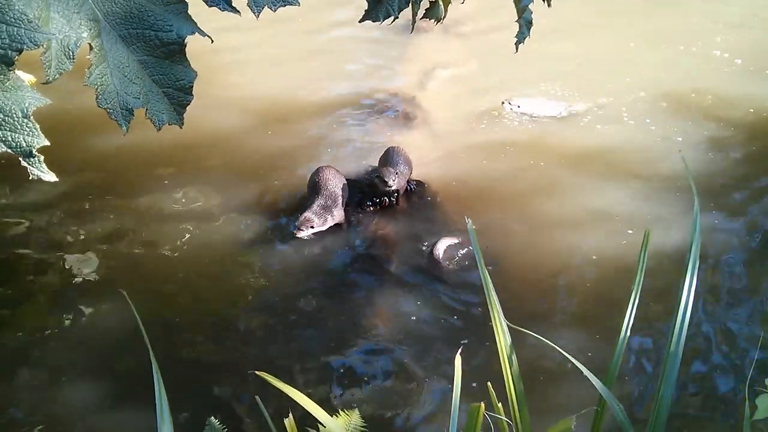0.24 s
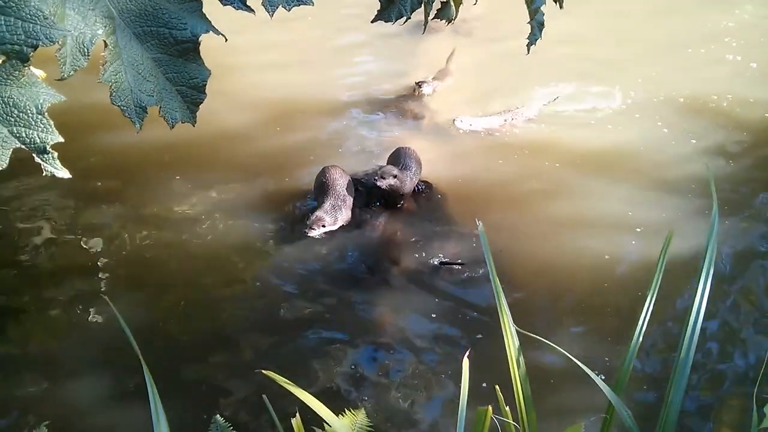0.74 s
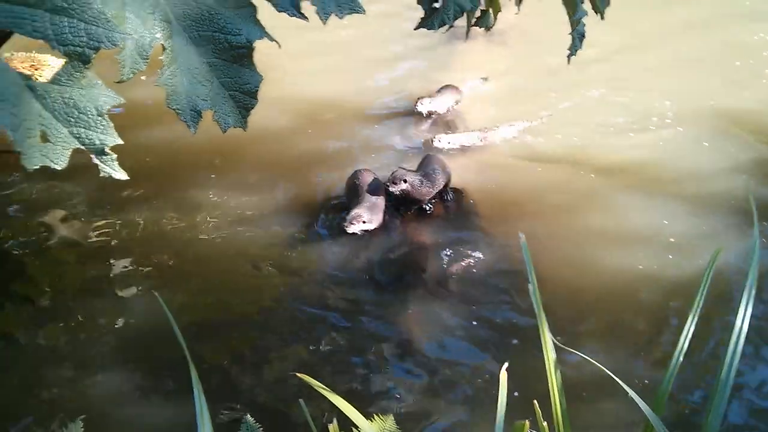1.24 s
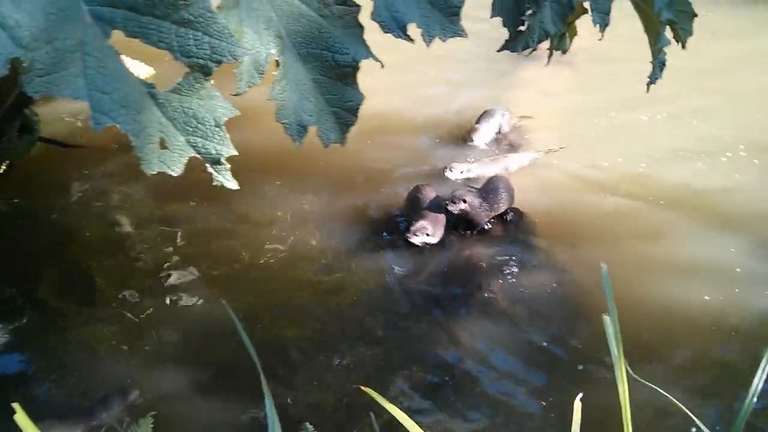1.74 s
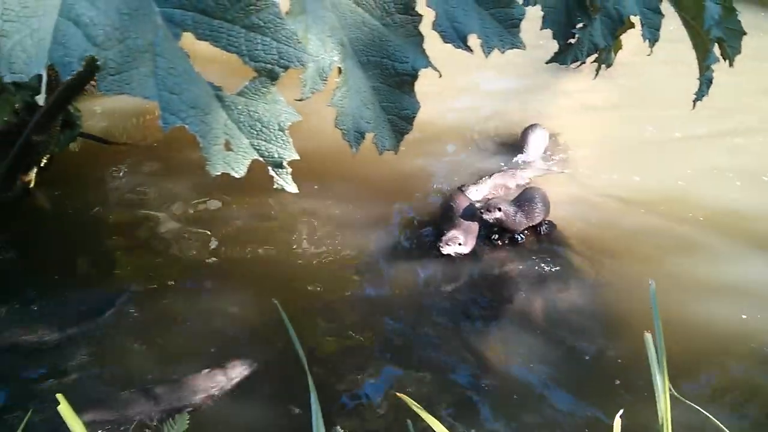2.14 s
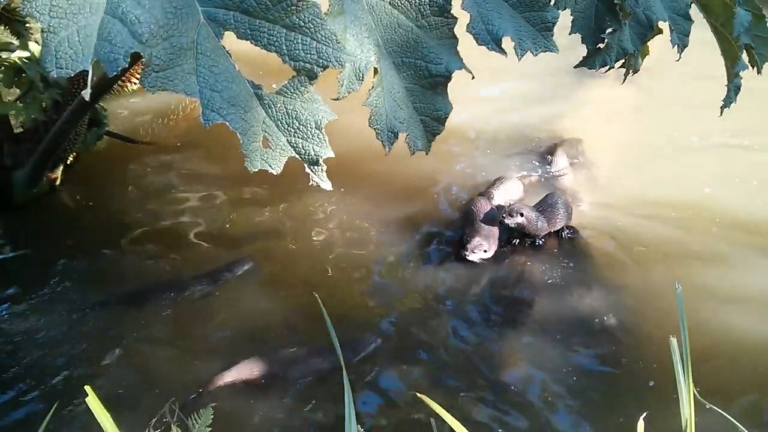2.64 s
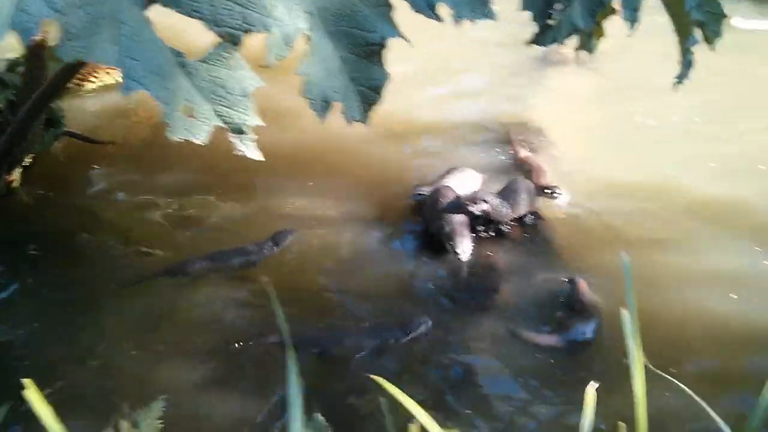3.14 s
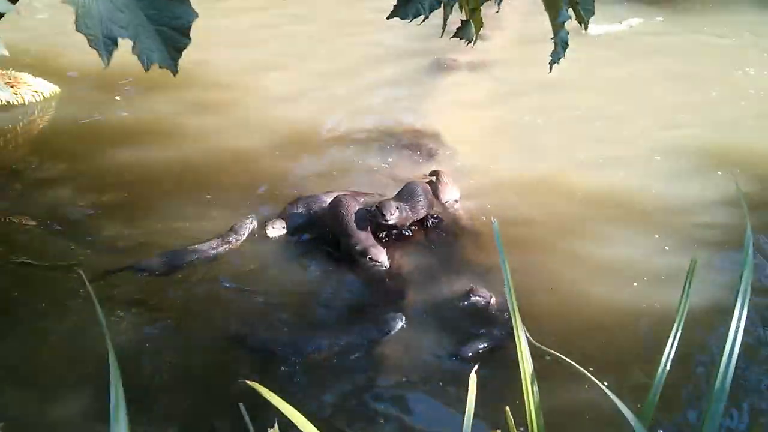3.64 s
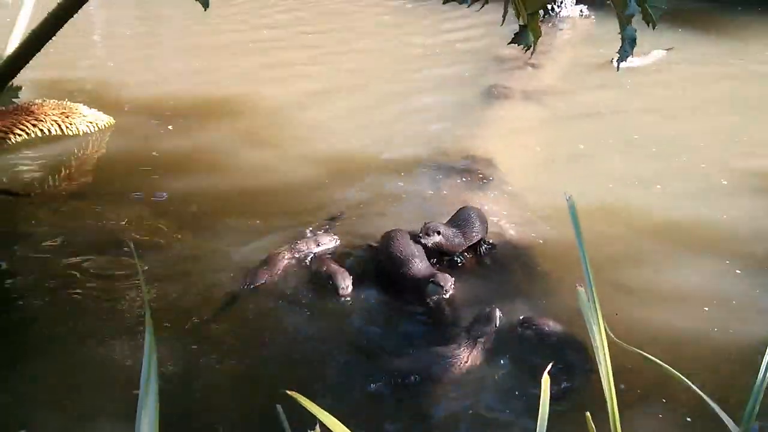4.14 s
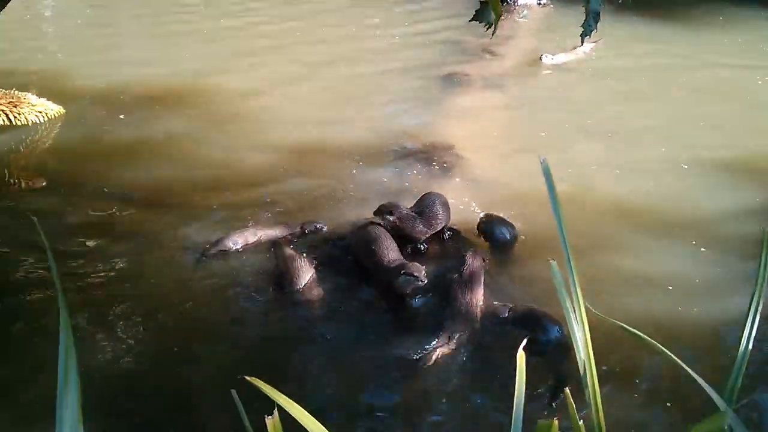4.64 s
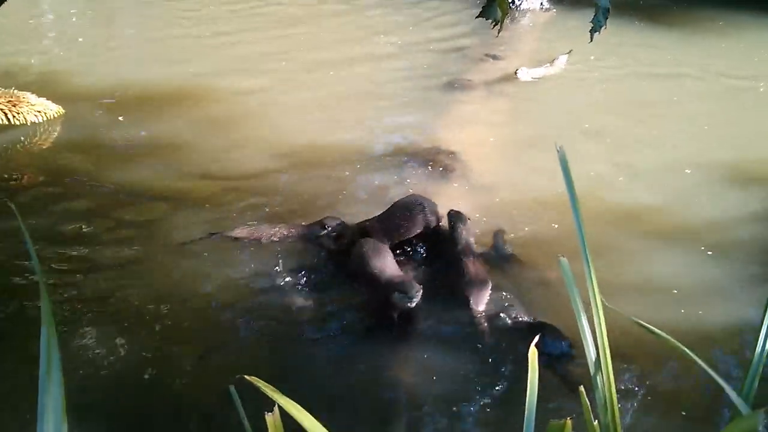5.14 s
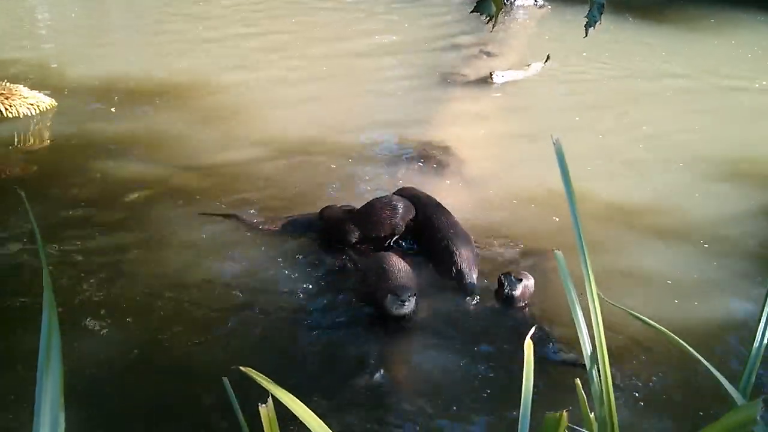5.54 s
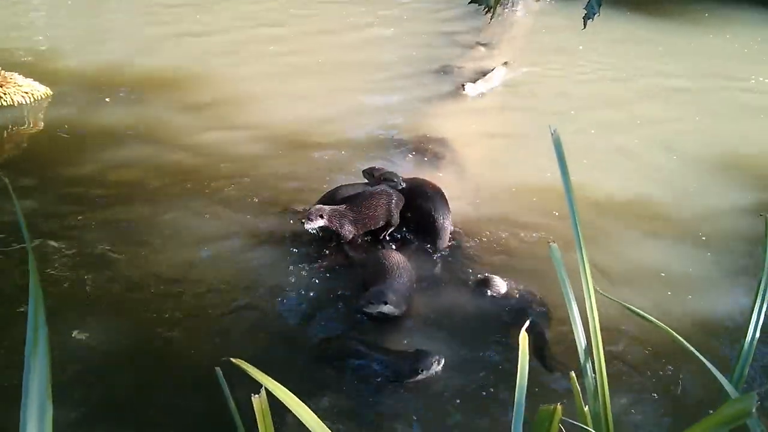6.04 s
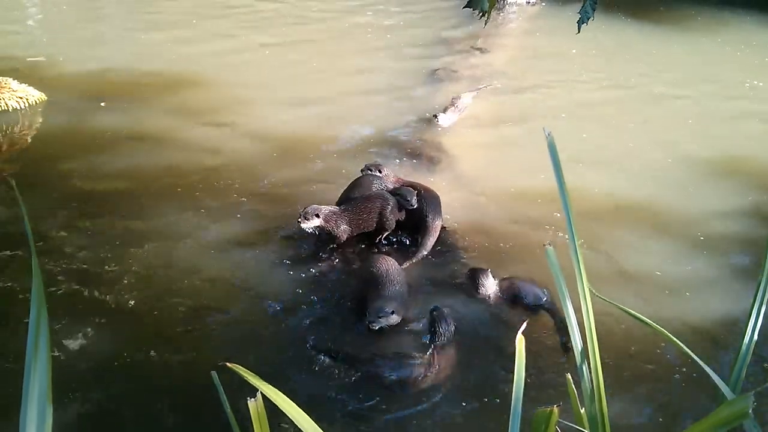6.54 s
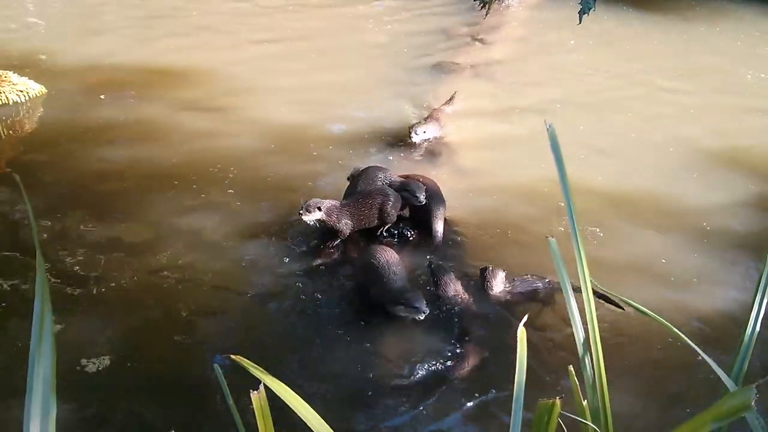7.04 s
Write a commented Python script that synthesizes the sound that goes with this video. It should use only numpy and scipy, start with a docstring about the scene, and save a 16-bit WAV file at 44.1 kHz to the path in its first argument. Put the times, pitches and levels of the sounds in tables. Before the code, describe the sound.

Small otters squeak piercingly and break into raspy, falling squeals and drawn-out wails in a pond, over low rumble, soft plops and hiss.

```python
"""Small otters crowd on a rock in a pond and beg close by: five falling squeaks break into lower, raspy
squeals or long wails. Other otters whistle and chatter in between and a few cry thinly further off.
Voices are unsteady partials with breath noise, whistles and far cries are wavering near-sines.
Water and banks throw back short echoes; behind lie rumble and hiss from coloured noise, and small
plops from ringing sines. The hiss grows halfway through. One microphone feeds both channels."""
import sys
import numpy as np
from scipy import signal
from scipy.fft import rfft, irfft, next_fast_len
from scipy.io import wavfile
from scipy.ndimage import uniform_filter1d

SR = 44100
rng = np.random.default_rng(int(sys.argv[2]) if len(sys.argv) > 2 else 0)


def persist_wave(psi):
    """Save psi, clipped to +-1, as 16-bit WAV."""
    counts = np.round(np.clip(psi, -1, 1) * 32767).astype(np.int16)
    wavfile.write(sys.argv[1], SR, np.atleast_2d(counts).T)


N = 321930
TIME = np.arange(N) / SR
TOP_HZ = 15700  # nothing is kept above this

# background colour before and after it brightens: pitch_hz, relative_density_db [dB per Hz]
CALM_COLOUR = [(18, -56), (30, -19), (59, -11), (108, -3), (230, 2), (399, -7.5), (591, 2), (830, -8.5),
               (921, -5), (2240, -12.5), (3320, -24), (4090, -13), (6370, -11.5), (8500, -4.5),
               (15500, -35)]
BRIGHT_COLOUR = [(18, -43), (30, -8), (64, -11), (105, -4), (467, 0), (728, -11.5), (970, 5.5),
                 (1440, -20.5), (1870, -18.5), (2300, -17.5), (3230, -20), (4090, -12), (6540, -6.5),
                 (8500, 2), (15500, -11)]
CALM_DB, BRIGHT_DB = -38.5, -34.5  # before the mix of the two and the level curves
# the background brightens once; the shares run 0-1
BRIGHTENS_S, BRIGHTEN_TIME_S, SHARE_BEFORE, SHARE_AFTER = 3.96, 0.11, 0.064, 0.75
# level curve of the high hiss: time_s, relative_level_db
HISS_CURVE = [(0, 0), (1.6, -.5), (3.7, -1), (4.15, 7), (4.9, 3.5), (6.2, 4.5), (7.3, 9.5)]
# level curve of the low outdoor rumble: time_s, relative_level_db
RUMBLE_CURVE = [(0, 1.5), (1.5, 0.6), (2.1, 2.7), (2.65, 0), (4.2, 3), (7.3, 3.5)]

# water plops: start_s, starting_pitch_hz, level_db, ring_s [time to fall 60 dB]
PLOPS = [(0.74, 149, -53, .15), (1.05, 727, -35, 0.12), (1.412, 234, -33.5, 0.16), (1.771, 236, -34, .15),
         (1.821, 148, -35, 0.14), (1.861, 253, -33.5, 0.23), (2.04, 260, -30, 0.1), (2.291, 208, -35, 0.14),
         (2.62, 730, -39, 0.17)]

# early echoes from water and banks: delay_s, level_db
EARLY_ECHOES = [(.0031, -16), (.0083, -9.5), (0.0141, -27)]
# colour of the sound scattered by leaves and ripples: pitch_hz, gain_db
SCATTER_COLOUR = [(2500, 3.5), (4500, 2.5), (6500, 4), (8300, 7.5), (11000, 1), (15000, 0)]
POND_T60_S, POND_WET_DB = .22, -14.5  # around the rock; wet level before the scatter colour
# colour of the near calls while the background is calm: pitch_hz, gain_db
DULL_COLOUR = [(8500, 0), (10000, -15.5), (11500, -15), (14000, -11)]

# thin far cries: start_s, length_s, start_hz, middle_hz, end_hz, peak_level_db,
#   loudest_at [share of length], octave_db
FAR_CRIES = [(1.798, 0.086, 1030, 1047, 1030, -37.5, 0.45, -18),
             (2.049, 0.39, 1020, 1032, 901, -46.5, .65, -1), (5.546, .48, 2410, 2368, 1894, -48, 0.56, -6),
             (6.096, 0.87, 1845, 1675, 1938, -49.5, 0.67, -3)]
FAR_SWELL_DB = 11  # from the edges of a far cry to its loudest moment
# nearly pure whistles near the rock: start_s, length_s, start_hz, middle_hz, end_hz, peak_level_db,
#   loudest_at [share of length], roughness [0-1]
WHISTLES = [(1.122, 0.027, 3540, 3370, 3210, -25.5, 0.39, 0.1),
            (1.423, 0.058, 5300, 4950, 5050, -39.5, 0.72, 0),
            (1.469, .09, 5120, 4430, 4420, -33.5, 0.72, 0.17),
            (1.553, 0.037, 4420, 3740, 2420, -39, .15, 0.48), (2.762, 0.071, 3480, 3315, 2990, -36, 1, 0.1),
            (3.013, .11, 3580, 3790, 3990, -32, 0.91, 0.26),
            (3.843, 0.048, 5220, 4830, 4200, -23.5, 1, 0.13),
            (3.885, 0.04, 4350, 5140, 5700, -20, .2, 0.02),
            (3.93, 0.047, 5720, 4620, 3050, -14.5, .35, 0.17),
            (3.997, .07, 3360, 2750, 2420, -38.5, 0.17, 0.4),
            (4.758, .095, 6070, 5500, 4650, -41, .25, 0.27),
            (5.233, 0.038, 3460, 3900, 4880, -26, 0.81, .2),
            (5.268, .046, 4880, 5140, 3470, -31, 0.78, 0.1),
            (6.293, 0.067, 5900, 5140, 4500, -29, 0.61, 0.14),
            (6.353, 0.056, 4600, 5370, 4180, -28.5, 0.91, 0.04),
            (6.411, 0.065, 2980, 3284, 2820, -31, .5, 0.35)]
WHISTLE_SWELL_DB = 8.5  # from the edges of a whistle to its loudest moment

# soft rough chatter: start_s, length_s, start_hz, end_hz, relative_level_db
CHATTER = [(2.731, 0.12, 1590, 1410, -44.5), (2.849, 0.08, 1482, 1387, -40.5),
           (2.91, 0.14, 1500, 1420, -42), (3.017, .17, 1474, 1350, -42)]
# breathy rasp in the voice: pitch_hz, gain_db
RASP_COLOUR = [(1500, -22), (2900, -2.5), (3800, 5), (4800, 7.5), (6200, 2.5), (8300, 8), (11500, -38),
               (13500, -21), (15500, -26)]
# throat and mouth colour of the low and the high register: pitch_hz, gain_db
SQUEAL_THROAT = [(1100, -31), (1750, -1), (2130, -15.5), (2350, 6.5), (2800, 0.5), (3400, 8), (4100, 1),
                 (5100, 10.5), (6300, 0), (8300, 9.5), (9700, 4.5), (12000, -5), (13500, -11), (15500, -26)]
SQUEAK_THROAT = [(2500, 9), (4200, 6), (6200, -10), (8300, -18), (10000, -6.5), (11500, -2), (13000, -24.5),
                 (15500, -27)]

# two squeals drawn out into wails: time_s, pitch_hz, 6_to_10_khz_db, treble_db [both relative]
FIRST_WAIL = [(3.935, 1834, -13, -33), (3.959, 1744, -15.5, -26), (4.081, 1712, -24, -37),
              (4.147, 1450, -24.5, -27), (4.181, 1260, -23, -23), (4.209, 1183, -24, -24),
              (4.341, 1149, -26.5, -24.5), (4.499, 1247, -28, -35), (4.535, 1204, -28, -40),
              (4.565, 1368, -28, -45), (4.585, 1324, -36, -40)]
LAST_WAIL = [(6.665, 1926, -21, -46), (6.721, 1800, -28, -35), (6.741, 1584, -22, -31),
             (6.781, 1429, -24, -27), (6.807, 1478, -25, -29), (6.827, 1316, -24.5, -25),
             (6.865, 1216, -30, -29), (6.939, 1127, -28, -28), (6.969, 1188, -28.5, -31),
             (7.161, 1062, -22.5, -28), (7.3, 1111, -21, -34)]
# squeals, the low register: start_s, length_s, first_hz, second_hz, slide_middle_s [after start],
#   slide_time_s, final_lift_hz, relative_level_db, fade_db, 6_to_10_khz_db [to the level],
#   6_to_10_khz_change_db, treble_db [to the level], mouth_hz, harsh_start [0-1], roughness [0-1]
SQUEALS = [(1.077, 0.066, 1777, 1475, 0.007, 0.0026, 3, -29, -7, 2.5, -6, -6, 4450, 0.33, 0.16),
           (1.148, 0.076, 1767, 1490, 0.037, .006, 5, -30, -0.5, 1, -1, -2, 4420, 0.95, 0.46),
           (1.216, 0.076, 1616, 1320, .039, 0.00495, 3, -25, -6.5, -2, 1, 0, 4360, 0.3, 0.24),
           (1.292, 0.04, 1350, 1493, 0.0054, 0.0032, 6, -27.5, 5, -6.5, -1, -17, 4200, 0, 0.2),
           (2.348, .19, 1870, 1304, 0.029, 0.014, 337, -24.5, -1, 6, -11.5, -3.5, 4630, 0.57, 0.19),
           (5.225, 0.054, 1748, 2025, 0.02, 0.0069, 3, -24, 2, 5.5, -11, -9, 4380, 0.42, 0.42),
           (5.315, .222, 1771, 1281, .074, 0.015, 188, -21.5, -0.5, 4, -9.5, 0, 4850, 0.78, 0.25),
           (6.794, .55, 1523, 1346, .015, 0.024, 0, -32, -7, -14.5, -2, -11, 2700, 0, 0.38)]
BREAK_S = 0.0194  # decay of the harsh start
LIFT_S, SQUEAL_RELEASE_SHARE = .022, 0.17  # growth time of the final lift; share of length that dies away
OPEN_TREBLE_DB = 4  # the mouth is widest mid-call: treble this much stronger than at the ends

# squeaks, the high register: start_s, length_s, attack_s, onset_hz, crest_hz, end_hz, catch [0-1],
#   relative_level_db, fade_db, 6_to_10_khz_db [to the level],
#   treble_db [to the level and the throat gain at the third partial], roughness [0-1]
SQUEAKS = [(0.995, .105, 0.0068, 4390, 3550, 3300, 0.55, -26, -12, -4.5, 7.5, 0.2),
           (2.198, .155, .024, 4790, 3687, 3153, 0, -21.5, -4, -1.5, 2.5, 0.14),
           (3.785, .15, 0.019, 5620, 4057, 3310, .9, -19.5, -10.5, 8.5, 7, 0.08),
           (5.078, .15, 0.012, 4790, 4287, 3216, .4, -13, -12.5, 2, 10.5, 0.19),
           (6.484, .188, 0.0041, 4806, 4150, 2866, .95, -20.5, -11.5, -3.5, -1, 0.37)]
FLICK_S = .017  # time constant of the drop from the onset pitch
# a full catch in the voice: lower and weaker
CATCH_S, CATCH_WIDTH_S, CATCH_PITCH_SHARE, CATCH_DB = 0.037, 0.011, .06, -10.5
CREST_S, SAG_POWER, SQUEAK_FADE_POWER = 0.04, 2.2, 2.75  # past the crest it sags; it fades ever faster
GROWL_HZ, GROWL_DB = 137, 1  # pulsing at full sag; the rate wavers
ACCENT_DB, ACCENT_S = 3.5, 0.012  # brief accent at the start


def undb(db):
    """Decibels to gain."""
    return 10 ** (np.asarray(db) / 20)


def unit(x):
    """Scale to rms 1."""
    return x / np.sqrt(np.mean(x ** 2) + 1e-20)


def gain_at(hz, points):
    """Gain of a (Hz, dB) spectrum at the given frequencies."""
    f, db = np.transpose(points)
    return undb(np.interp(np.log(hz + 1e-3), np.log(f), db))


def colour(x, points):
    """Filter a sound with a (Hz, dB) spectrum."""
    return irfft(rfft(x) * gain_at(np.fft.rfftfreq(len(x), 1 / SR), points), len(x))


def wander(n, hz):
    """Smooth chance of spread 1, moving mostly slower than hz."""
    size = next_fast_len(n + SR // 4)
    f = np.fft.rfftfreq(size, 1 / SR)
    lowpass = np.exp(-.5 * (f / hz) ** 2)
    return unit(irfft(rfft(rng.standard_normal(size)) * lowpass, size))[:n]


def add(out, start, x):
    """Mix a sound in from a given sample on."""
    x = x[:max(N - start, 0)]
    out[start:start + len(x)] += x


def span(s, length, attack_s, release_s):
    """First sample, time since the start and attack-hold-release gate of one call."""
    t = np.arange(int(length * SR)) / SR
    ramp = np.clip(np.minimum(t / attack_s, (length - t) / release_s), 0, 1)
    return int(s * SR), t, np.sin(np.pi / 2 * ramp) ** 2


def step(x, middle, width):
    """A smooth rise from 0 to 1."""
    return .5 + .5 * np.tanh((x - middle) / (2 * width))


def arch(u, first, middle, last):
    """A parabola through three values as u runs from 0 to 1."""
    return first + (last - first) * u + (middle - (first + last) / 2) * (1 - (2 * u - 1) ** 2)


def swell(u, peak):
    """0 at the loudest moment, falling to -1 at both ends of a call."""
    peak = np.clip(peak, .05, .95)
    return -np.maximum((peak - u) / peak, (u - peak) / (1 - peak)) ** 2


def bright_share():
    """How far the background has turned from calm to bright, 0-1."""
    share = SHARE_BEFORE + (SHARE_AFTER - SHARE_BEFORE) * step(TIME, BRIGHTENS_S, BRIGHTEN_TIME_S)
    return np.clip(share, 0, 1)


def background():
    """A low restless rumble under a smooth high hiss: coloured noise, its octaves changing level apart."""
    hiss_db = np.interp(TIME, *np.transpose(HISS_CURVE))
    rumble_db = np.interp(TIME, *np.transpose(RUMBLE_CURVE))
    share = bright_share()
    calm = undb(CALM_DB) * unit(colour(rng.standard_normal(N), CALM_COLOUR))
    bright = undb(BRIGHT_DB) * unit(colour(rng.standard_normal(N), BRIGHT_COLOUR))
    spectrum = rfft(calm * np.sqrt(1 - share) + bright * np.sqrt(share))
    octave = np.log2(np.clip(np.fft.rfftfreq(N, 1 / SR), 62.5, 8000) / 62.5)
    out = np.zeros(N)
    for band in range(8):
        x = irfft(spectrum * np.clip(1 - abs(octave - band), 0, 1), N)
        if band < 5:  # centred on 1 kHz and below
            level_db = rumble_db + 3.0 * wander(N, 18) - 2.17
        else:
            level_db = hiss_db + .5 * wander(N, 18)
        out += x * undb(level_db)
    return out


def plops():
    """Pockets of air ring and rise a little in pitch as the swimmers stir the water."""
    out, t = np.zeros(N), TIME[:SR // 4]
    for s, hz, db, ring in PLOPS:
        tone = np.sin(2 * np.pi * hz * t * (1 + .5 * t))
        fade = np.exp(-np.log(1000) * t / ring) * (1 - np.exp(-t / 0.001))
        add(out, int(s * SR), undb(db) * tone * fade)
    return out


def pond(x, wet_db, t60):
    """A few early echoes and a short scattered tail from banks and leaves."""
    t = TIME[:SR // 2]
    tail = colour(rng.standard_normal(len(t)), SCATTER_COLOUR)
    fade = unit(np.exp(-np.log(1000) * t / t60) * (1 - np.exp(-t / 0.044))) / np.sqrt(len(t))
    response = undb(wet_db) * tail * fade
    response[0] = 1  # direct sound
    for delay, db in EARLY_ECHOES:
        response[int(delay * SR)] += undb(db)
    return signal.fftconvolve(x, response)[:N]


def whistle(hz, db, jitter, overtone_db):
    """A wavering near-sine with an added octave."""
    n = len(hz)
    phase = 2 * np.pi * np.cumsum(hz * (1 + jitter * wander(n, 294))) / SR
    tone = np.sin(phase) + undb(overtone_db) * np.sin(2 * phase)
    return np.sqrt(2) * undb(db + 2 * wander(n, 70)) * tone


def far_cries():
    """Long thin calls from further away: arching near-sines that swell and fade."""
    out = np.zeros(N)
    for s, length, first_hz, middle_hz, last_hz, db, peak, octave_db in FAR_CRIES:
        start, t, gate = span(s, length, attack_s=0.014, release_s=.016)
        hz = arch(t / length, first_hz, middle_hz, last_hz)
        level_db = db + FAR_SWELL_DB * swell(t / length, peak)
        add(out, start, gate * whistle(hz, level_db, jitter=0.019, overtone_db=octave_db))
    return out


def whistles():
    """Short whistles of the other otters: arching near-sines whose roughness shakes the pitch."""
    out = np.zeros(N)
    for s, length, first_hz, middle_hz, last_hz, db, peak, rough in WHISTLES:
        start, t, gate = span(s, length, attack_s=0.0044, release_s=0.0023)
        hz = arch(t / length, first_hz, middle_hz, last_hz)
        level_db = db + WHISTLE_SWELL_DB * swell(t / length, peak)
        add(out, start, gate * whistle(hz, level_db, 0.088 * rough, overtone_db=-15))
    return out


def bands(hz):
    """Shares of a frequency in the low, middle and treble range of the voice."""
    first, second = (.5 + .5 * np.tanh((hz - edge) / 300) for edge in (6100, 9700))
    return 1 - first, first - second, second


def voice(hz, dbs, rough, colour_of, jitter, jitter_hz, quaver, shimmer_db, flutter_db, rasp_db):
    """Vocal folds with unsteady cycles sound through the throat; roughness shakes the pitch and adds rasp."""
    n = len(hz)
    hz = hz * (1 + jitter * rough * wander(n, jitter_hz) + quaver * wander(n, 52))
    phase = 2 * np.pi * np.cumsum(hz) / SR
    k = np.arange(1, 14)[:, None]  # partial numbers
    weight = colour_of(k * hz) * (k * hz < TOP_HZ)
    # head turns and rippling reflections make each partial flutter on its own
    flutter = undb(flutter_db * np.array([wander(n, 25.5) for _ in k]))
    partials = np.sin(k * phase + 2 * np.pi * rng.random(k.shape)) * flutter
    # air rushes through once a cycle
    air = rfft(rng.standard_normal(n) * (1 + np.cos(phase)))
    f = np.fft.rfftfreq(n, 1 / SR)
    tone_share = np.sqrt(np.clip(1 - rough ** 2 / 2, 0, 1))
    out = np.zeros(n)
    for db, share, air_share in zip(dbs, bands(k * hz), bands(f)):
        w = weight * share
        # levelled by its own power; the floor keeps an empty band quiet
        tone = np.sum(w * partials, axis=0) / np.sqrt(np.sum(w ** 2, axis=0) / 2 + 0.0016)
        breath = unit(irfft(air * air_share * gain_at(f, RASP_COLOUR), n))
        rasp = breath * rough * undb(rasp_db)
        out += undb(db) * (tone * tone_share + rasp)
    return out * undb(shimmer_db * wander(n, 107))


def chatter(s, length, first_hz, last_hz, db):
    """A soft rough note through a nearly closed mouth, unsteady in pitch and level."""
    start, t, gate = span(s, length, attack_s=0.021, release_s=0.027)
    hz = first_hz + (last_hz - first_hz) * t / length

    def throat(f):
        mouth_db = 7 * np.exp(-((f - 4200) / 600) ** 2) - 12 * step(f, 4800, 200)
        return gain_at(f, SQUEAL_THROAT) * undb(mouth_db)

    x = voice(hz, (db, db - 19, db - 20), 0.32, throat, jitter=0.042, jitter_hz=250,
              quaver=0.0165, shimmer_db=3, flutter_db=4, rasp_db=5.5)
    return start, x * gate


def squeal_voice(t, hz, dbs, mouth_hz, harsh, rough):
    """The low register: many partials, lifted near the mouth resonance, with a harsh start."""
    def throat(f):
        return gain_at(f, SQUEAL_THROAT) * undb(8.3 * np.exp(-((f - mouth_hz) / 800) ** 2))

    rough = rough + harsh * np.exp(-(t / BREAK_S) ** 2)
    return voice(hz, dbs, rough, throat, jitter=0.0366, jitter_hz=258,
                 quaver=0.00497, shimmer_db=0.6, flutter_db=3.0, rasp_db=-0.5)


def wail(curve, first_db, middle_db, last_db, overtones_db, mouth_hz, harsh,
         first_rough, middle_rough, last_rough):
    """A long wavering squeal; its low partials and its roughness arch slowly."""
    s, *columns = np.transpose(curve)
    start, t, gate = span(s[0], s[-1] - s[0], attack_s=0.0048, release_s=0.0044)
    u = t / t[-1]
    hz, mid_db, top_db = (np.interp(s[0] + t, s, c) for c in columns)
    dbs = arch(u, first_db, middle_db, last_db), mid_db + overtones_db, top_db + overtones_db
    rough = arch(u, first_rough, middle_rough, last_rough)
    return start, gate * squeal_voice(t, hz, dbs, mouth_hz, harsh, rough)


def squeal(s, length, first_hz, second_hz, slide_at_s, slide_s, lift_hz, db, fade_db,
           mid_db, mid_change_db, top_db, mouth_hz, harsh, rough):
    """A nasal whine that slides to a second pitch and lifts at the end."""
    start, t, gate = span(s, length, attack_s=0.0037, release_s=SQUEAL_RELEASE_SHARE * length)
    u = t / length
    slide = (second_hz - first_hz) * step(t, slide_at_s, slide_s)
    hz = first_hz + slide + lift_hz * np.exp((t - length) / LIFT_S)
    db = db + fade_db * u
    treble_db = db + top_db - OPEN_TREBLE_DB * (2 * u - 1) ** 2
    dbs = db, db + mid_db + mid_change_db * u, treble_db
    return start, gate * squeal_voice(t, hz, dbs, mouth_hz, harsh, rough)


def squeak(s, length, attack_s, onset_hz, crest_hz, end_hz, catch, db, fade_db, mid_db, top_db, rough):
    """A piercing note with few partials: it flicks down, may catch, crests and sags."""
    start, t, gate = span(s, length, attack_s, release_s=0.0027)
    caught = catch * np.exp(-((t - CATCH_S) / CATCH_WIDTH_S) ** 2)
    sag = np.clip((t - CREST_S) / (length - CREST_S), 0, 1) ** SAG_POWER
    hz = crest_hz * (1 - CATCH_PITCH_SHARE * caught)
    hz = hz + (onset_hz - crest_hz) * np.exp(-t / FLICK_S) + (end_hz - crest_hz) * sag
    db = db + ACCENT_DB * np.exp(-(t / ACCENT_S) ** 2) + CATCH_DB * caught
    db = db + fade_db * (t / length) ** SQUEAK_FADE_POWER
    db = db + GROWL_DB * np.sqrt(sag) * np.sin(2 * np.pi * GROWL_HZ * t + wander(len(t), 30))

    def throat(f):
        return gain_at(f, SQUEAK_THROAT)

    third_db = 20 * np.log10(throat(3 * hz))
    x = voice(hz, (db, db + mid_db, db + top_db + third_db), rough, throat, jitter=0.06, jitter_hz=395,
              quaver=0.0023, shimmer_db=1.73, flutter_db=1.3, rasp_db=-12)
    return start, x * gate


def near_otters():
    """Whistles, chatter, wails, squeals and squeaks from the rock."""
    out = whistles()
    for call, rows, call_db in ((chatter, CHATTER, -2.5), (squeal, SQUEALS, -2.2), (squeak, SQUEAKS, -1.4)):
        for row in rows:
            start, x = call(*row)
            add(out, start, x * undb(call_db))
    add(out, *wail(FIRST_WAIL, first_db=-24.5, middle_db=-31, last_db=-29, overtones_db=-1, mouth_hz=5100,
                   harsh=.8, first_rough=0.13, middle_rough=0.314, last_rough=0.16))
    add(out, *wail(LAST_WAIL, first_db=-32, middle_db=-30.5, last_db=-25, overtones_db=-2.5, mouth_hz=4400,
                   harsh=0.11, first_rough=0.47, middle_rough=0.272, last_rough=0.12))
    return out


def scene():
    """Everything reaches one microphone; the near calls brighten together with the background."""
    otters = pond(near_otters(), wet_db=POND_WET_DB, t60=POND_T60_S)
    share = bright_share()
    otters = share * otters + (1 - share) * colour(otters, DULL_COLOUR)
    far = pond(far_cries(), wet_db=-10.5, t60=0.26)
    mono = background() + plops() + far + otters
    return np.array([mono, mono])


def record(dry):
    """Peaks overload the microphone on one side, leaving a low bump; a limiter acts and the top is cut."""
    overload = np.maximum(dry[0] - .45, 0)
    bump = colour(overload, [(20, -11), (70, 4.5), (200, -9), (1500, -70)])
    envelope = np.sqrt(uniform_filter1d(dry[0] ** 2, size=200) + 1e-9)
    limited = dry / (1 + (envelope / undb(-9)) ** 4) ** (1 / 4)
    top_cut = signal.ellip(12, .1, 80, TOP_HZ, fs=SR, output="sos")
    return signal.sosfilt(top_cut, limited - undb(-6) * bump)


dry = scene()
out = record(dry)
persist_wave(out)
```